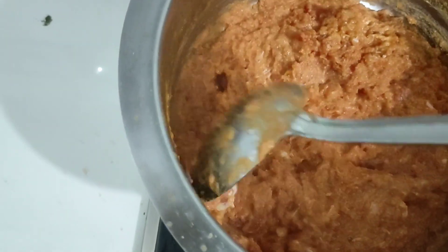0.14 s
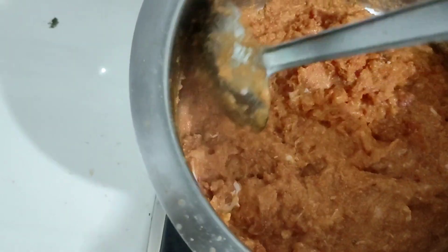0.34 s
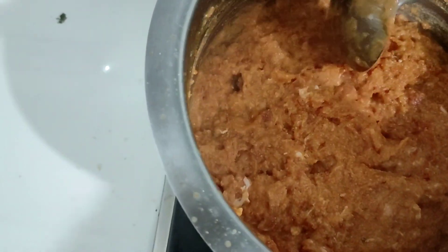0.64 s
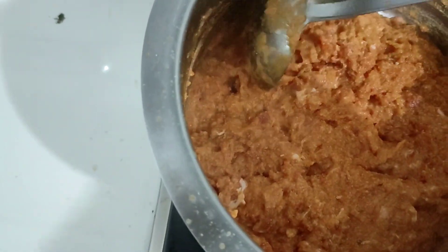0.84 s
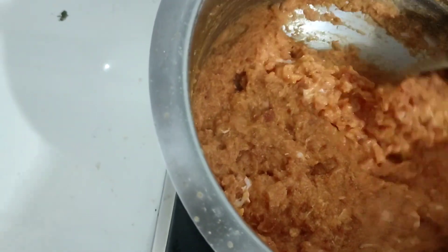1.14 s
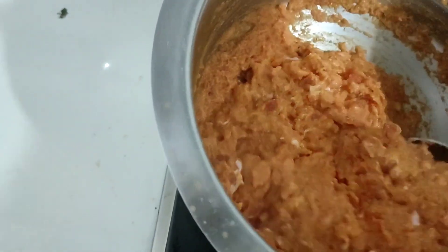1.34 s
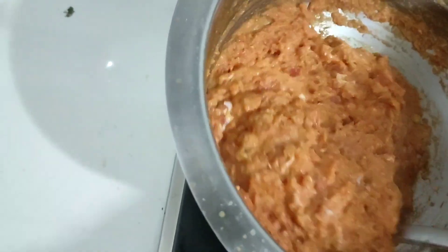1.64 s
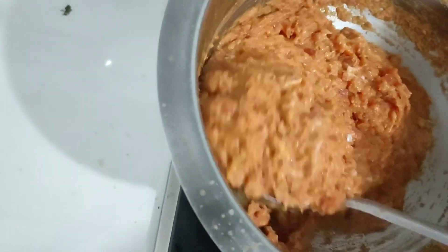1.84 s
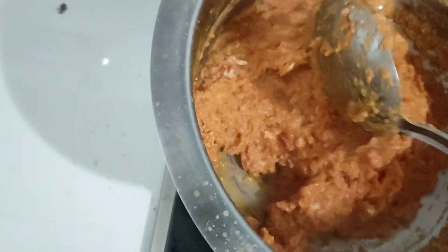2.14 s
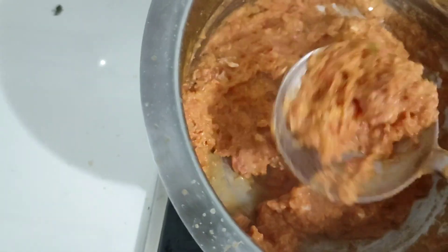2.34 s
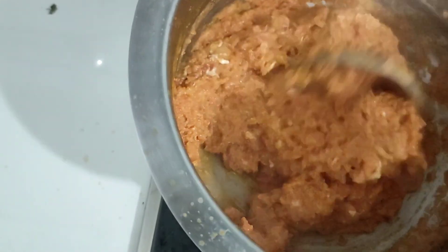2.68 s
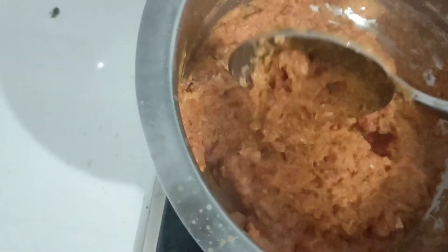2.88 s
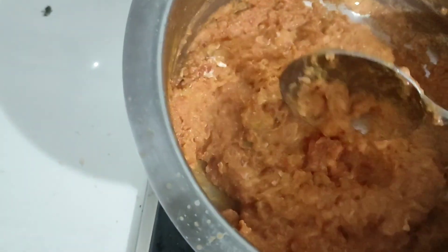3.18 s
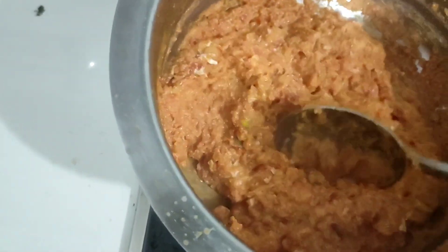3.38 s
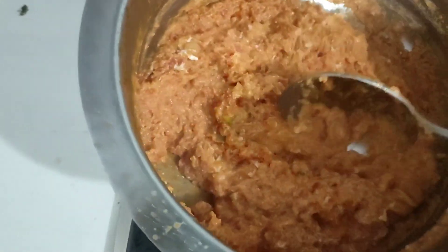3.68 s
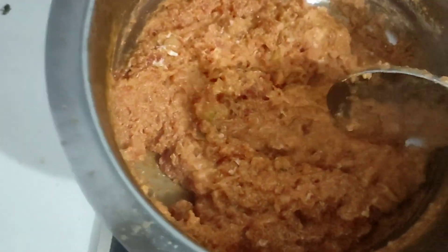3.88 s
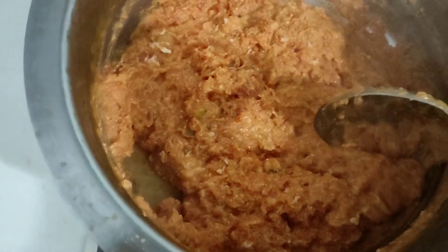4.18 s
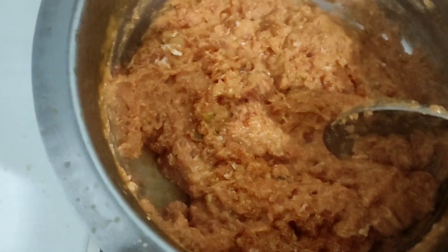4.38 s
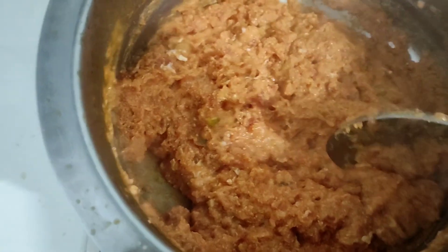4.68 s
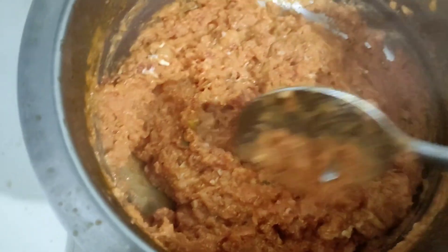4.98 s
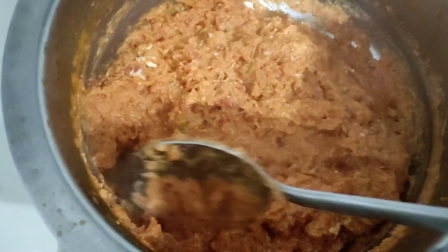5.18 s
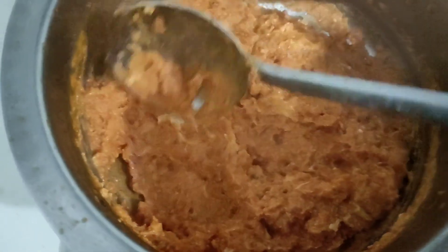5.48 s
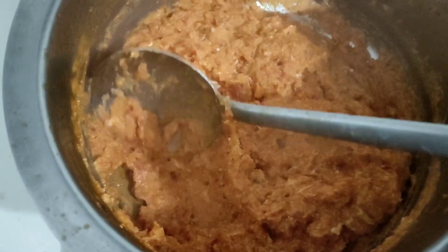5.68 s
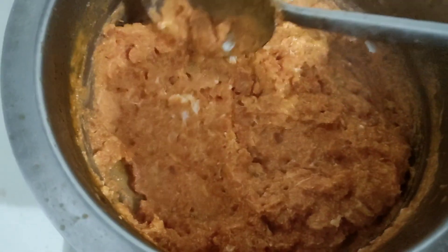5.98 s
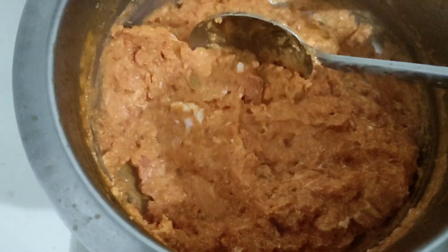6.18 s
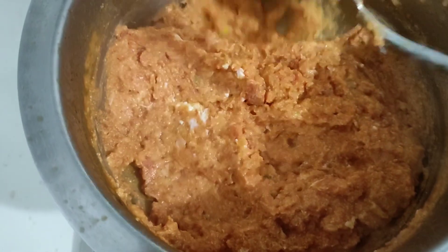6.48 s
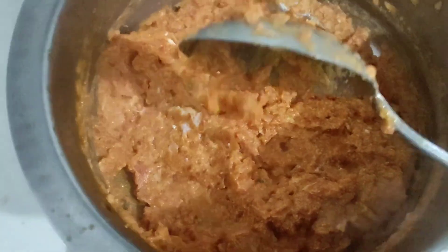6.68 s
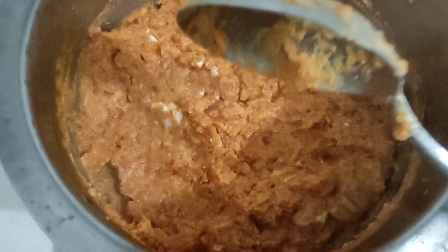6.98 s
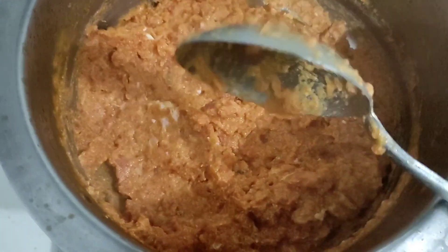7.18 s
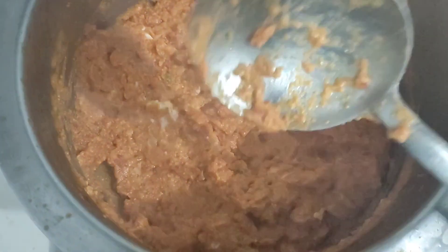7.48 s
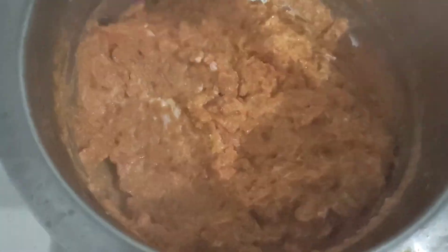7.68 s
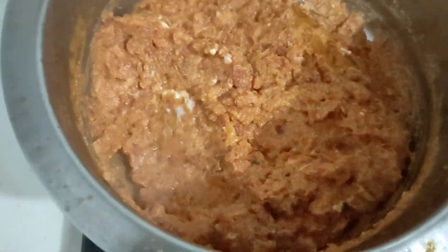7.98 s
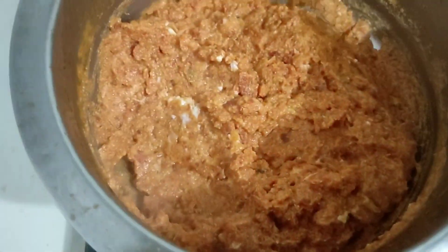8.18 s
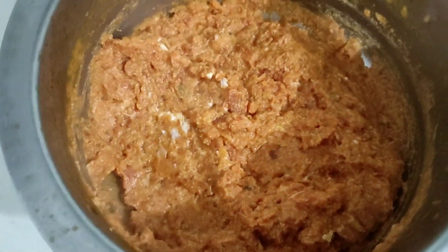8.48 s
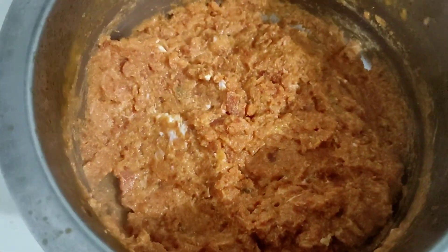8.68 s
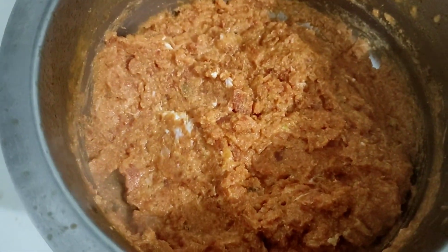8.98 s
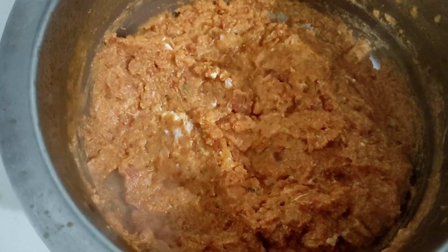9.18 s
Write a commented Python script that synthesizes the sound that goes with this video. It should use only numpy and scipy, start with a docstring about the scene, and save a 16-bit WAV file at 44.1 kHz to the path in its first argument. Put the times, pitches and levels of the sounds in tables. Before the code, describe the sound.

Wet paste squelches under a scraping steel spoon, the pot groans briefly, ringing rim taps follow, and the spoon is set down over faint sizzling.

```python
"""A steel spoon stirs thick food in a steel pot on a gas ring, heard close up in a hard-walled kitchen.
The spoon scrapes (friction noise through wall resonances) and knocks the wall (dying noise and beating modes);
the pot groans as it slips on its support (gliding tones). The spoon is rapped clean on the rim five times
and put down. Flame and faint sizzle (coloured noise) go on; the close recorder holds the blows down."""
import sys
import numpy as np
from scipy import signal
from scipy.fft import rfft, irfft, next_fast_len
from scipy.io import wavfile
from scipy.ndimage import uniform_filter1d

SR = 44100
rng = np.random.default_rng(int(sys.argv[2]) if len(sys.argv) > 2 else 0)


def digitize_waveform(pressure):
    """Quantize a signal to 16-bit integers and store it at the path in sys.argv[1].

    Rows of a 2-D input are taken as channels; values are limited to [-1, 1].
    """
    field = np.atleast_2d(pressure).T
    bounded = np.clip(field, -1, 1)
    quanta = np.round(bounded * 32767).astype(np.int16)
    wavfile.write(sys.argv[1], SR, quanta)


N = 411894
TIME = np.arange(N) / SR
SECOND = TIME[:SR]   # the first second, the length of every struck sound
BAND_EDGES = 22 * 2 ** (np.arange(30) / 3)   # third octaves, Hz
BAND_HZ = np.sqrt(BAND_EDGES[1:] * BAND_EDGES[:-1])

# Strokes through the paste. Each row: start in seconds, speeding up in seconds, slowing down in seconds,
# peak scraping in dB, peak squelching in dB before the squelch is set back in the mix.
STROKES = [(-0.14, 0.2, 0.033, -25.5, -35), (0.445, 0.044, 0.098, -32, -56),
           (0.53, 0.11, 0.036, -29.5, -38), (0.98, 0.19, 0.21, -26.5, -31), (1.25, 0.063, 0.21, -45.5, -27),
           (1.449, 0.055, 0.68, -42, -28), (1.78, 0.14, 0.023, -49, -32.5), (2.1, 0.091, 0.05, -45.5, -42),
           (3.95, 0.021, 0.02, -30, -20), (4.89, 0.039, 0.018, -46, -43), (6.657, 0.021, 0.013, -26.5, -31)]
# Resonances of the scraped wall. Each row: frequency in Hz, width in Hz, level in dB before it wanders.
SCRAPED_WALL = [(1187, 100, -9), (1700, 250, -39), (2400, 510, -13), (2730, 200, -12), (3945, 430, 3),
                (4340, 190, 2), (5080, 300, -2), (5260, 140, -1.5), (5960, 350, -1.5), (6520, 190, 0),
                (6960, 220, -7), (8140, 80, -0.5), (8670, 580, -1), (10560, 560, -6.5), (9860, 1300, -11.5),
                (11450, 780, -5.5), (13700, 2000, -16)]
# The few wall resonances that sing even under a gentle stroke. Each row: frequency in Hz, width in Hz,
# relative level in dB.
GENTLE_WALL = [(1670, 110, 5), (2100, 760, -1), (4070, 91, -10)]
# Colour of the paste pushed ahead of the spoon. Each row: frequency in Hz, relative density in dB per Hz.
SQUELCH_COLOUR = [(88, -23), (150, -1), (274, -6), (492, 3.5), (554, -14), (874, -4.5), (975, -12),
                  (1600, -15), (2080, -49), (3520, -120)]
STROKE_SWELL_DB = 10   # a stroke swells by this much
GENTLE_WALL_DB, GENTLE_WALL_FOLLOWS = -30.5, .45   # level at full rubbing; share of the stroke's swing followed
SNAPS_PER_S, SNAPS_DB = 1200, -8.5   # tiny bits snapping under the edge; level relative to the scrape


def stirring(bank):
    """The edge slips over the steel in tiny catches and grates on bits of food; paste squelches ahead of it."""
    rub, push = 0, 0
    for s, rise_s, fall_s, scrape_db, squelch_db in STROKES:
        stroke = swell(s, rise_s, fall_s, STROKE_SWELL_DB)
        rub = rub + from_db(scrape_db) * stroke
        push = push + from_db(squelch_db) * stroke
    gentle_wall = np.array([resonate(grains(per_s=1300, spread_db=6.0), GENTLE_WALL) for ear in range(2)])
    catches = from_db(2.6 * drift(260) + .6 * drift(40))
    # each crushed grain is a burst of about a millisecond
    crushed = np.abs(grains(per_s=110, spread_db=3.2))
    grit = rms_one(signal.lfilter([1], [1, -np.exp(-1 / (.001 * SR))], crushed))
    rough = rng.standard_normal((2, N)) + .7 * rng.standard_normal(N)   # partly shared by both channels
    friction = rough * (catches + 2.3 * grit)
    wall = shifting(friction, SCRAPED_WALL, wander_db=4.5, change_per_s=9)
    scrape = rub * wall + from_db(GENTLE_WALL_DB) * rub ** GENTLE_WALL_FOLLOWS * gentle_wall
    scrape = bounces(scrape, share=.7, above_hz=1500, change_per_s=6.0)
    squelch = push * from_db(-10.0 + 2.0 * drift(27)) * steady(bank, SQUELCH_COLOUR)
    snaps = resonate(grains(SNAPS_PER_S, spread_db=3.0), [(2500, 1500, -7), (9000, 9000, 0)])
    return (scrape + from_db(SNAPS_DB) * rub * snaps) * pan(-4.5) + squelch


# Spoon against the wall. Each row: time in seconds, strength in dB, weight put on the base in dB, sharpness of
# the edge in dB, freedom to ring in dB, ring length as a share of the free decay, and the two modes favoured
# by the contact point in Hz and Hz.
KNOCKS = [(0.053, -34, -18, -16.5, 7.5, 1.06, 1240, 2260), (0.3145, -37.5, 13, 4.5, 14.5, 0.87, 1860, 1840),
          (0.483, -67, -24, 7, -3, 1, 3800, 4400), (0.582, -48.5, -19, 1, -3, 1.2, 3800, 4400),
          (0.825, -44, 1, -2.5, -2, 1.2, 1822, 1620), (0.958, -30, 5, 4.5, 11.5, 0.56, 1740, 1740),
          (1.036, -45, -20, 4, -5, 1, 3800, 4400), (1.0786, -38, -23, 14.5, 2, 1, 3800, 4400),
          (1.088, -41, -20, 13, 4, 1.1, 3800, 4400), (1.111, -45, -20, 12, 3, 1, 3800, 4300),
          (1.22, -38, -25, 13, 2, 0.69, 3770, 4400), (1.5452, -30.5, -0.5, 8, 8.5, 0.65, 4600, 1800),
          (1.661, -37, 1, 8.5, -1, 0.87, 1680, 2112), (2.7594, -28.5, 6, 7.5, 7.5, 0.94, 1720, 1740),
          (3.375, -46.5, -8, 10.5, -4, 1, 3800, 1720), (3.382, -50, -7, 10, -11, 1, 3800, 1720),
          (3.8972, -22, -7, -2.5, 7, 0.84, 1054, 1925), (3.971, -31, -15, -9, 6, 0.62, 1880, 4450),
          (4.7268, -48.5, -5, 6, 2, .5, 1690, 2112), (4.781, -51, -11, 10, -2, 0.73, 1670, 1735),
          (4.8487, -42.5, -15, -9, 12, 0.91, 980, 2130), (5.6059, -20.5, 2.5, -1.5, 5.5, 0.95, 1040, 1200)]
# Spoon rapped clean on the rim. Each row: time in seconds, strength in dB, the two favoured modes in Hz and Hz.
RIM_RAPS = [(6.679, -13.5, 1034, 1490), (6.892, -7.5, 1044, 2400), (7.070, -16.5, 990, 1720),
            (7.241, -17.5, 1000, 1770), (7.406, -22, 2340, 1750)]
# Pot rocking back onto its support. Each row: time in seconds, strength in dB.
POT_BUMPS = [(1.605, -23), (1.64, -25), (1.889, -27.5), (3.973, -17.5), (4.188, -22), (4.727, -20.5),
             (4.78, -21.5)]
# Clear modes of the pot. Each row: frequency in Hz, relative level in dB, free decay by 60 dB in seconds.
POT_MODES = [(653, -8, .45), (830, -9, .35), (989, -2, .8), (1093, -12, .4), (1141, -14, .37),
             (1238, -10.5, .9), (1308, -14, .6), (1423, -7, .47), (1534, -11, .4), (1669, -2, .6),
             (1728, -3, .5), (1822, -3, .7), (2114, -4, .7), (2240, -6, .55), (2608, -10, .46),
             (2972, -14, .5), (3770, -12, .45), (3825, -12, .5), (4290, -13, .55), (4360, -10, .5),
             (4470, -10, .35), (6560, -13, .35), (8400, -13, .35)]
# Colour of the pot's dense modes. Each row: frequency in Hz, relative density in dB per Hz before the tilt.
POT_WASH = [(350, -30), (600, -3), (906, -42), (997, 8), (1070, 4.5), (1780, 2), (3210, -3), (3730, -2.5),
            (8270, -7), (16000, -19.5)]
# Colour of the contact on the pot. Each row: frequency in Hz, relative density in dB per Hz before the tilt.
POT_TICK = [(80, -5), (290, -2), (500, 8.5), (1320, 3.5), (1720, 6.5), (2810, -1), (3750, 5.5), (5800, 3),
            (8210, 1), (9630, -2), (12000, -5.5), (16000, -33)]
# What each kind of blow excites, relative to its strength and before the mix in blows();
# tilts of wash and tick in dB per octave; the body takes rise_s to respond.
KNOCK_TOUCH = dict(thud_db=-4.5, boom_db=3.5, ring_db=-5.5, tick_db=9.5, tilt_db=-1, tick_tilt_db=1.2,
                   rise_s=0.001)
RAP_TOUCH = dict(thud_db=4, boom_db=7.5, ring_db=-3.5, wash_db=-1, tick_db=7.5, tilt_db=0.1,
                 tick_tilt_db=1.3, rise_s=0.017, ring_length=0.87)
BUMP_TOUCH = dict(thud_db=-10, boom_db=-2, ring_db=-23.5, wash_db=-23.5, tick_db=-23.5, tilt_db=-4.5,
                  favoured_hz=1770, rise_s=.002)


def pot_blows(bank):
    """Knocks on the wall, raps on the rim and bumps on the support all strike the same steel pot."""
    rows = []
    for s, db, weight, edge, free, length, *favoured_hz in KNOCKS:
        rows.append(blow(s, db, favoured_hz, weight_db=weight, edge_db=edge, free_db=free,
                         ring_length=length, **KNOCK_TOUCH))
    rows += [blow(s, db, favoured_hz, **RAP_TOUCH) for s, db, *favoured_hz in RIM_RAPS]
    rows += [blow(s, db, **BUMP_TOUCH) for s, db in POT_BUMPS]
    return blows(bank, rows, POT_MODES, POT_WASH, POT_TICK, tick_t60=0.03, thud_stretch=0.99,
                 cluster_db=-5.0, bounce_share=0.48)


# Spoon put down. Each row: time in seconds, strength in dB, weight in dB, sharpness of the edge in dB.
SET_DOWN = [(8.297, -8, -5.5, -2), (8.385, -19.5, -5, -14), (8.661, -27.5, 1, 0.5),
            (8.684, -29.5, 9.5, 3.5)]
# Clear modes of the spoon. Each row: frequency in Hz, relative level in dB, decay by 60 dB in seconds.
SPOON_MODES = [(1620, -12, .6), (2090, -9, .55), (2390, -1, .55), (2490, -1, .5), (2822, -1, .6),
               (3000, -2, .55), (3315, -3, .5), (3442, 0, .55), (3535, -2, .55), (3822, -5, .4),
               (3935, -2, .42), (5340, -6, .45)]
# Colour of the spoon's dense modes and of its contact. Each row: frequency in Hz, relative density in
# dB per Hz before the tilt.
SPOON_WASH = [(350, -38), (600, -25), (919, -14), (1130, -5.5), (1960, -5), (2400, 2.5), (3940, -3),
              (4910, -4.5), (6290, -10.5), (6920, -30), (7620, -11), (12200, -21), (15400, -44),
              (16000, -70)]
SET_DOWN_TOUCH = dict(thud_db=-9.5, boom_db=-43, ring_db=-7.5, tick_db=2.5, tilt_db=-3, favoured_hz=3260,
                      rise_s=0.00068)


def spoon_put_down(bank):
    """The loose spoon rings in its own higher modes as it lands."""
    rows = [blow(s, db, weight_db=weight, edge_db=edge, **SET_DOWN_TOUCH) for s, db, weight, edge in SET_DOWN]
    spoon = blows(bank, rows, SPOON_MODES, SPOON_WASH, SPOON_WASH, tick_t60=0.053, thud_stretch=0.78,
                  cluster_db=-7.0, bounce_share=0.51)
    return spoon * pan(1.6)


# Per dB of sharpness: dB less ring, dB per octave brighter wash, dB more thud and less boom,
# dB shorter contact, dB per octave brighter tick.
EDGE_RING_LOSS, EDGE_TILT, EDGE_THUD_GAIN, EDGE_SHORTENS, EDGE_TICK_TILT = 0.15, 0.19, 0.54, 0.54, 0.052


def blow(s, db, favoured_hz, thud_db, boom_db, ring_db, tick_db, tilt_db, rise_s, tick_tilt_db=0,
         ring_length=1, wash_db=0, weight_db=0, edge_db=0, free_db=0):
    """Weight drives the base; a sharp edge trades ring for a shorter, louder tick and boom for thud."""
    thud = db + weight_db + thud_db + EDGE_THUD_GAIN * edge_db
    boom = db + weight_db + boom_db - EDGE_THUD_GAIN * edge_db
    ringing = db + ring_db + free_db - EDGE_RING_LOSS * edge_db
    wash = db + wash_db
    tilt = tilt_db + EDGE_TILT * edge_db
    tick = db + tick_db + edge_db
    tick_tilt = tick_tilt_db + EDGE_TICK_TILT * edge_db
    tick_stretch = from_db(-EDGE_SHORTENS * edge_db)
    return (s, thud, boom, rise_s, ringing, ring_length, favoured_hz, wash, tilt,
            tick, tick_tilt, tick_stretch)


# Colour of the thud through the support. Each row: frequency in Hz, relative density in dB per Hz.
THUD_COLOUR = [(29, -54), (50, -23.5), (118, -7.5), (189, -10), (221, -2.5), (334, -9.5), (377, 4),
               (452, -14.5), (548, -21), (657, -4), (900, -27.5), (1170, -23), (1980, -120)]
# Booming modes of the base. Each row: frequency in Hz, relative level in dB, free decay by 60 dB in seconds.
BASE_MODES = [(222, -13, .55), (312, -9, .4), (380, 0, .4), (455, -3, .3), (497, 0, .38)]
# The steel's crowded high modes come in clusters. Each row: frequency in Hz, width in Hz, level in dB
# before it wanders.
MODE_CLUSTERS = [(3800, 470, 9), (4380, 570, 4.5), (5420, 880, -2.5), (6380, 960, 7), (8780, 1800, 6),
                 (11980, 3700, 6.5)]


def blows(bank, rows, modes, wash, tick, tick_t60, thud_stretch, cluster_db, bounce_share):
    """Each blow: a contact tick, thud and boom through the support, a wash of dense modes, a few clear ones."""
    body, steel, ticks = np.zeros((3, 2, N))
    room_t60 = at_hz(KITCHEN_T60, BAND_HZ)
    spreading, meeting = 1 - np.exp(-SECOND / 0.001), 1 - np.exp(-SECOND / .0013)
    for (s, thud_db, boom_db, rise_s, ring_db, ring_length, favoured_hz, wash_db, tilt,
         tick_db, tick_tilt, tick_stretch) in rows:
        thud = from_db(thud_db) * dying(bank, THUD_COLOUR, room_t60 * thud_stretch)
        boom = from_db(boom_db) * ring(BASE_MODES, 452, 0.97, favour_db=9.0, split=0.012, spread_db=5.0,
                                       phase_spread=0.46)
        clang = from_db(ring_db) * ring(modes, favoured_hz, ring_length, favour_db=11.0, split=0.00345,
                                        spread_db=3.5, phase_spread=1.0)
        add(body, s, (thud + boom + clang) * (1 - np.exp(-SECOND / rise_s)))
        dense = dying(bank, tilted(wash, tilt), room_t60) * spreading
        add(steel, s, from_db(wash_db) * contact_colour(dense, gain=.8))
        # the metal chatters for a few milliseconds as it meets, heard directly
        chatter = dying(bank, tilted(tick, tick_tilt), tick_t60 * tick_stretch) * meeting
        add(ticks, s, from_db(tick_db) * chatter)
    flutter = from_db(1.3 * drift(60))   # the steel's wash dies unevenly
    steel = flutter * bounces(steel, bounce_share, above_hz=1230, change_per_s=2.17) + from_db(6.5) * ticks
    clusters = shifting(steel, MODE_CLUSTERS, wander_db=4.5, change_per_s=3)
    return body + 1.186 * steel + from_db(cluster_db) * np.std(steel) * clusters


FAVOUR_OCTAVES = 0.079   # reach of a contact point's favour among neighbouring modes
PARTNER_DB = -3   # the second mode of each beating pair, before chance weights it


def ring(modes, favoured_hz, length, favour_db, split, spread_db, phase_spread):
    """Struck modes in pairs that beat, as the steel is not quite round; each blow weighs them anew."""
    hz, mode_db, t60 = np.repeat(modes, 2, axis=0).T
    hz = hz * (1 + split * np.resize([-1, 1], len(hz)) * rng.uniform(.85, 1.15, len(hz)))
    near = np.exp(-(np.log2(hz[:, None] / favoured_hz) / FAVOUR_OCTAVES) ** 2).max(axis=1)
    pair_db = np.resize([0, PARTNER_DB], len(hz))
    chance_db = spread_db * rng.standard_normal(len(hz))
    strength = from_db(mode_db + pair_db + favour_db * near + chance_db)
    # both modes of a pair start in step
    phase = 2 * np.pi * rng.random(len(modes)) + phase_spread * rng.standard_normal((2, len(modes)))
    phase = np.repeat(phase, 2, axis=1)
    decay = (2j * np.pi * hz - np.log(1000) / (t60 * length)) / SR
    # the ring is built as whole hundredths of a second times the samples within one
    coarse = np.exp(np.outer(decay, np.arange(0, SR, SR // 100)))
    fine = np.exp(np.outer(decay, np.arange(SR // 100)))
    struck = np.sqrt(2) * strength / np.linalg.norm(strength) * np.exp(1j * phase)
    return ((struck[:, None, :] * coarse.T) @ fine).real.reshape(2, SR)


def contact_colour(x, gain, count=3):
    """Each contact point has its own short paths round the wall, which comb the treble anew at every blow."""
    treble = signal.sosfilt(signal.butter(1, 2000, "high", fs=SR, output="sos"), x)
    out = x.copy()
    for lag in (rng.uniform(.0012, .0045, count) * SR).astype(int):
        out[:, lag:] += gain * rng.choice([-1, 1]) * treble[:, :-lag]
    return out * np.std(x) / np.std(out)


# The pot slips on its support. Each row: start in seconds, building in seconds, easing in seconds, pitch at the
# peak in Hz, glide in Hz per second, peak in dB before the mix, flutter in dB, rasp relative to the tone in dB
# before the mix.
SLIPS = [(0.048, 0.016, 0.02, 571.4, -28, -15, 4, -32), (0.319, 0.011, 0.05, 494, -100, -6.5, 0.5, -40),
         (4.021, 0.12, 0.11, 485, 100.5, -21, 6, -35), (4.187, 0.083, 0.052, 367.4, 150.5, -6.5, 1.5, -31),
         (4.188, 0.019, 0.052, 507, -100, -8, 0.5, -37), (4.244, 0.014, 0.012, 487.5, -300, -5, 6, -28),
         (4.361, 0.12, 0.057, 468.5, -200, -19.5, 4.5, -42),
         (4.495, 0.088, 0.037, 376.2, 119.5, -4.5, 2, -30),
         (4.591, 0.0088, 0.0099, 491.4, -300, -7, 3.5, -18)]
SLIP_SWELL_DB, SLIP_WAVER = 10.5, 0.01655   # rise and fall of a slip; typical share by which its pitch wavers


def groan():
    """The base sticks and slips on its support: gliding low tones, with grind and rasp at every catch."""
    tone, catching, rasping = 0, 0, 0
    for s, rise_s, fall_s, hz, glide, db, flutter_db, rasp_db in SLIPS:
        pitch = hz + glide * np.clip(TIME - s - rise_s, -rise_s, fall_s)
        wavering = pitch * (1 + SLIP_WAVER * drift(40.6))
        wave = np.sin(2 * np.pi * np.cumsum(wavering) / SR)
        level = from_db(db - 7.0 + flutter_db * drift(51)) * swell(s, rise_s, fall_s, SLIP_SWELL_DB)
        catch = level * (1 + wave)
        tone = tone + level * wave
        catching = catching + catch
        rasping = rasping + from_db(rasp_db) * catch
    slips = grains(per_s=1500, spread_db=2.5) * catching
    grind = np.std(tone) * resonate(slips, [(740, 68, 72), (1160, 120, 1.5)])
    # the same catches shake the base
    judder = np.std(tone) * resonate(slips, [(434, 14, -2), (449, 23, 1)])
    rasp = rasping * shifting(rng.standard_normal((2, N)), [(1550, 730, 3.5), (2330, 740, -5), (2960, 250, -5)],
                              wander_db=-3.0, change_per_s=4.0)
    return (tone + from_db(-13.5) * judder + from_db(-27) * grind + from_db(-4.0) * rasp) * pan(1.0)


# Swells of the low rumble. Each row: start in seconds, rising in seconds, falling in seconds, peak in dB
# before it flickers.
RUMBLE_SWELLS = [(.7, 0.14, .1, -41), (2, 0.13, 0.45, -49), (7.85, 0.032, 0.77, -40.5)]
# Colour of the flame. Each row: frequency in Hz, relative density in dB per Hz.
FLAME_COLOUR = [(15, -66), (25, -32), (59, -49), (75, -25.5), (109, 1), (182, -22), (253, -15), (356, -23),
                (394, -17.5), (468, -34), (510, -20.5), (1050, -30), (1240, -34), (1500, -53), (1950, -51),
                (3300, -120)]
# Colour of the steam's hiss. Each row: frequency in Hz, relative density in dB per Hz.
SIZZLE_COLOUR = [(590, -54), (1000, 7), (1250, 9), (1550, 11), (1810, 7), (2500, 10.5), (3080, 10.5),
                 (6330, 7), (7190, 1.5), (8450, 8.5), (9830, 9.5), (10900, -7), (14400, 7), (15300, -9),
                 (16000, -11)]
# Small pops and one sharp click from the pot. Each row: time in seconds, peak in dB, pitch in Hz,
# decay in seconds.
SMALL_POPS = [(3.053, -41.5, 6500, 0.03), (3.253, -34.5, 8000, 0.0043), (5.282, -40, 6500, 0.0099),
              (5.408, -41.5, 1500, 0.0095), (5.479, -45, 11000, 0.011), (6.172, -41, 690, 0.0087),
              (6.285, -41, 9000, 0.047)]
FLAME_DB = -46   # before it flickers
SIZZLE_DB, SIZZLE_RISE_DB_PER_S = -51.5, 0.4273   # level at the start; the paste sizzles more as it heats
POP_WIDTH_SHARE = 0.59   # resonance width as a share of the pitch


def stove(bank):
    """The flame rumbles; steam leaves the paste with a fine hiss and crackle; a few small pops and a click."""
    surge = sum(from_db(db) * swell(s, rise_s, fall_s, depth_db=22) for s, rise_s, fall_s, db in RUMBLE_SWELLS)
    flame = np.hypot(from_db(FLAME_DB), surge) * from_db(1.0 * drift(24)) * steady(bank, FLAME_COLOUR)
    steam = from_db(SIZZLE_DB + SIZZLE_RISE_DB_PER_S * TIME)
    hiss = steady(bank, SIZZLE_COLOUR) * steam * from_db(1.4 * drift(31))
    crackle = np.array([resonate(grains(per_s=200, spread_db=5.5), [(2000, 1600, -10.5), (8740, 430, 7)])
                        for ear in range(2)])
    pops = np.zeros((2, N))
    for s, db, hz, decay_s in SMALL_POPS:
        burst = resonate(rng.standard_normal((2, SR)), [(hz, POP_WIDTH_SHARE * hz, 0)])
        add(pops, s, from_db(db) * np.exp(-SECOND / decay_s) * burst)
    return flame + hiss + pops + steam * from_db(-10.5) * crackle


# Decay of the hard-walled kitchen. Each row: frequency in Hz, decay by 60 dB in seconds.
KITCHEN_T60 = [(100, 0.63), (400, 0.65), (1500, 0.64), (4000, 0.58), (8000, 0.52), (15000, 0.32)]


def kitchen(bank, x):
    """Diffuse echo of the hard walls: dying noise that starts 4 ms after the direct sound."""
    tail = dying(bank, [(100, 2.0), (5000, 9.5), (16000, 1.2)], at_hz(KITCHEN_T60, BAND_HZ)) * (SECOND > .004)
    return signal.fftconvolve(x, rms_one(tail) / np.sqrt(SR), axes=1)[:, :N]


# How alike left and right are. Each row: frequency in Hz, likeness from 0 to 1 before the treble is widened.
LIKENESS = [(60, 1), (130, 0.98), (290, 0.85), (640, 0.64), (1410, 0.11), (3100, 0.21), (6820, 0.74),
            (15000, 0.54)]


def noise_bank():
    """Third-octave stereo noise, most alike in both channels in the deep bass: bands x 2 x N."""
    white, bank = rng.standard_normal((2, 2, N)), []
    for k, hz in enumerate(BAND_HZ):
        band = signal.butter(2, BAND_EDGES[k:k + 2], "band", fs=SR, output="sos")
        mid, side = signal.sosfilt(band, white[k % 2])
        alike = np.clip(at_hz(LIKENESS, hz) - 0.24 * (hz > 700), -1, 1)
        stereo = np.sqrt(1 + alike) * mid + np.sqrt(1 - alike) * side * [[1], [-1]]
        bank.append(rms_one(stereo).astype(np.float32))
    return np.array(bank)


def band_gains(spectrum):
    """Share of each band in a sound of rms 1."""
    gain = from_db(at_hz(spectrum, BAND_HZ)) * np.sqrt(BAND_HZ)
    return (gain / np.linalg.norm(gain)).astype(np.float32)


def steady(bank, spectrum):
    """Coloured noise of rms 1."""
    return np.roll(np.tensordot(band_gains(spectrum), bank, 1), rng.integers(N), axis=1)


def dying(bank, spectrum, t60):
    """A second of modes too dense to tell apart, each band dying at its own rate."""
    start = rng.integers(N - SR)
    rate = np.float32(np.log(1000) / (t60 * np.ones(len(BAND_HZ))))
    fall = np.exp(-np.minimum(np.outer(rate, np.float32(SECOND)), 30))
    return np.einsum("b,bt,bct->ct", band_gains(spectrum), fall, bank[:, :, start:start + SR])


def tilted(spectrum, db_per_octave):
    """The same spectrum, brighter or duller."""
    return [(hz, db + db_per_octave * np.log2(hz)) for hz, db in spectrum]


def grains(per_s, spread_db):
    """Random clicks of very uneven size."""
    sizes = from_db(spread_db * np.minimum(rng.exponential(1, N), 5)) * rng.choice([-1, 1], N)
    return sizes * (rng.random(N) < per_s / SR) + 1e-18


def resonate(x, resonances):
    """Parallel resonances (Hz, width in Hz, dB); rms 1."""
    out = 0
    for hz, width, db in resonances:
        r = np.exp(-np.pi * width / SR)
        feed = np.array([1, 0, -1]) * (1 - r * r) / 2
        feedback = [1, -2 * r * np.cos(2 * np.pi * hz / SR), r * r]
        out = out + from_db(db) * signal.lfilter(feed, feedback, x + 1e-18)
    return rms_one(out)


def shifting(x, resonances, wander_db, change_per_s):
    """Steep-sided groups of modes (Hz, width in Hz, dB) trade energy as the contact point travels; rms 1."""
    out, power = 0, 0
    for hz, width, db in resonances:
        edges = np.clip([hz - width / 2, hz + width / 2], 20, .45 * SR)
        band = signal.butter(2, edges, "band", fs=SR, output="sos")
        gain = from_db(db + wander_db * drift(change_per_s))
        out = out + gain * signal.sosfilt(band, x + 1e-18)
        power = power + width * gain ** 2
    return rms_one(out / np.sqrt(power))


def bounces(x, share, above_hz, change_per_s, count=5):
    """Treble bounces between close steel surfaces; paths shift as the spoon moves, so its colour shimmers."""
    treble = signal.sosfilt(signal.butter(2, above_hz, "high", fs=SR, output="sos"), x)
    share, out = np.clip(share, 0, .95), x.copy()
    for ear in range(2):
        paths = np.array([drift(change_per_s) for k in range(count)])
        paths *= np.sqrt(share / (1 - share) / np.sum(paths ** 2, axis=0))
        lags = (rng.uniform(.0006, .006, count) * SR).astype(int)
        for gain, lag in zip(paths, lags):
            out[ear, lag:] += gain[lag:] * treble[ear, :N - lag]
    return out * np.sqrt(1 - share)


GRIP_DB_PER_S, STOP_DB_PER_S = 1500, 398   # any rubbing sets in and stops at these rates


def swell(start, rise_s, fall_s, depth_db):
    """Gain of one rubbing movement: it grips, swells to a peak, eases off by as much and stops."""
    t = TIME - start - rise_s
    away = np.minimum(np.maximum(-t / rise_s, t / fall_s), 1)
    outside_db = GRIP_DB_PER_S * np.maximum(-t - rise_s, 0) + STOP_DB_PER_S * np.maximum(t - fall_s, 0)
    return from_db(-depth_db * away - np.minimum(outside_db, 120))


def drift(rate):
    """Slow chance of spread 1, drawn every 40 samples and joined by straight lines."""
    r = np.exp(-80 * np.pi * rate / SR)
    slow = signal.lfilter([1], [1, -2 * r, r * r], rng.standard_normal(N // 40 + 2002))[2000:]
    return np.interp(np.arange(N) / 40, np.arange(len(slow)), rms_one(slow))


def from_db(db):
    """Amplitude gain of a level in dB."""
    return 10 ** (np.asarray(db) / 20)


def rms_one(x):
    """Scale to rms 1."""
    return x / np.sqrt(np.mean(x ** 2) + 1e-20)


def at_hz(points, hz):
    """Read a table along log frequency."""
    points = np.array(points)
    return np.interp(np.log(hz), np.log(points[:, 0]), points[:, 1])


def pan(db):
    """Left and right gains that differ by db, left over right."""
    return from_db([[db / 2], [-db / 2]])


def add(out, s, sound):
    """Mix a sound in at a time in seconds."""
    i = round(s * SR)
    out[:, i:i + sound.shape[1]] += sound[:, :N - i]


def scene():
    """Rubbing, blows on the pot, the spoon put down, the groan, the kitchen's echo and the stove beneath."""
    bank = noise_bank()
    rubbing, groaning = stirring(bank), groan()
    struck = pot_blows(bank) + spoon_put_down(bank)
    echo = kitchen(bank, from_db(-8.5) * rubbing + from_db(-13) * groaning)
    return rubbing + struck + groaning + echo + stove(bank)


def limiter(x, threshold_db, release_db_per_s, attack_s):
    """The gain drops within milliseconds of a loud blow and climbs back while it dies away."""
    power = uniform_filter1d(np.mean(x ** 2, axis=0), size=256)
    level_db = 10 * np.log10(np.maximum(power, 1e-12))
    over_db = np.maximum(level_db - threshold_db, 0)
    released_db = release_db_per_s * TIME
    held_db = np.maximum.accumulate(over_db + released_db) - released_db
    r = np.exp(-1 / (attack_s * SR))
    return x * from_db(-signal.lfilter([1 - r], [1, -r], held_db))


# The microphone's two ports. Each row: frequency in Hz, left over right in dB.
PORT_BALANCE = [(60, -4.5), (110, 0), (200, 0), (380, 0), (700, 0.5), (1290, -2.5), (2380, -6.5),
                (4400, -7), (8120, -10.5), (15000, 18)]
CUTOFF_HZ = 16000


def record(dry):
    """The two ports colour the sound differently; blows are limited, peaks rounded, the top is cut."""
    size = next_fast_len(N + SR)
    lean_db = at_hz(PORT_BALANCE, np.arange(size // 2 + 1) * SR / size + 1)
    heard = irfft(rfft(dry, size) * from_db([lean_db / 2, -lean_db / 2]), size)[:, :N]
    held = np.tanh(limiter(heard, threshold_db=-12.5, release_db_per_s=82.0, attack_s=0.0021))
    return signal.sosfilt(signal.ellip(10, .2, 80, CUTOFF_HZ, fs=SR, output="sos"), held)


dry = scene()
out = record(dry)
digitize_waveform(out)
```